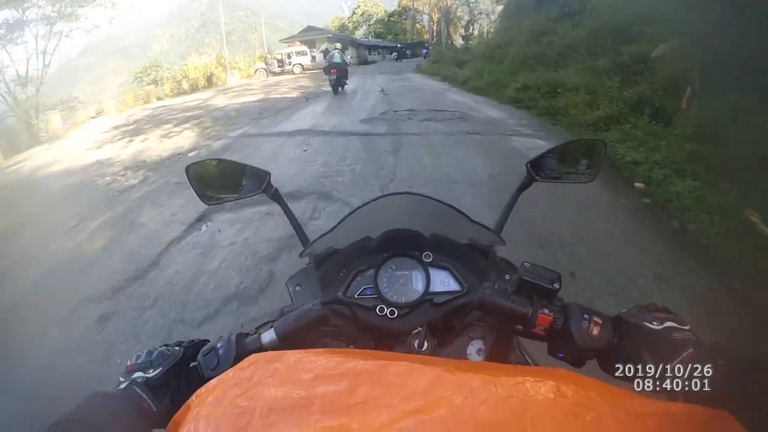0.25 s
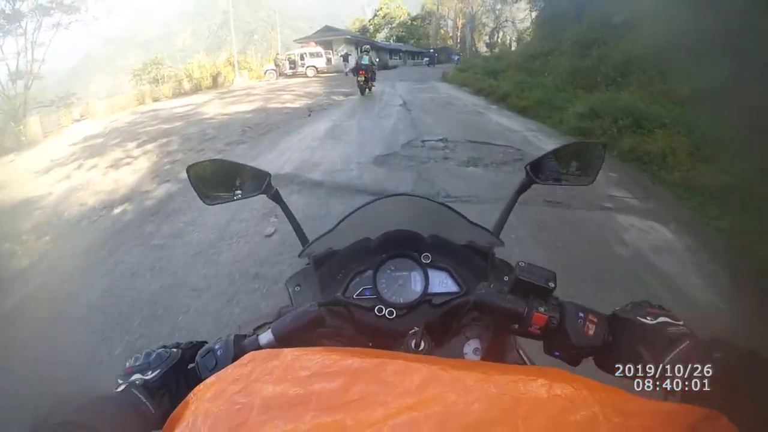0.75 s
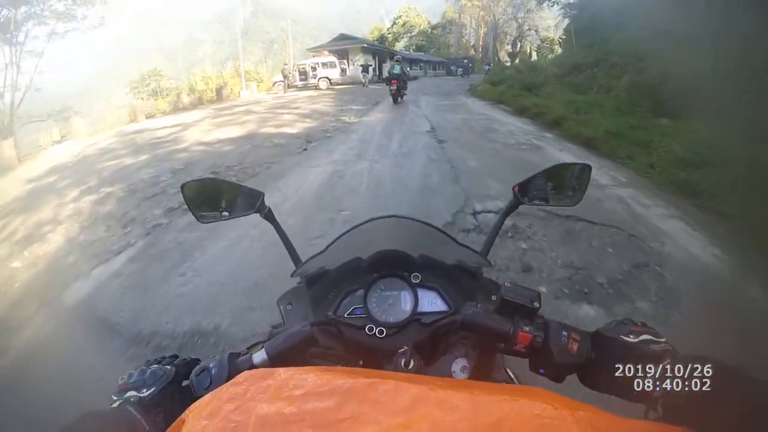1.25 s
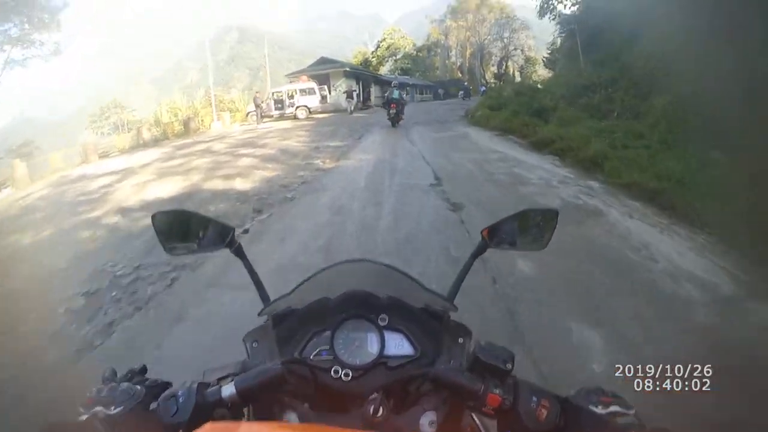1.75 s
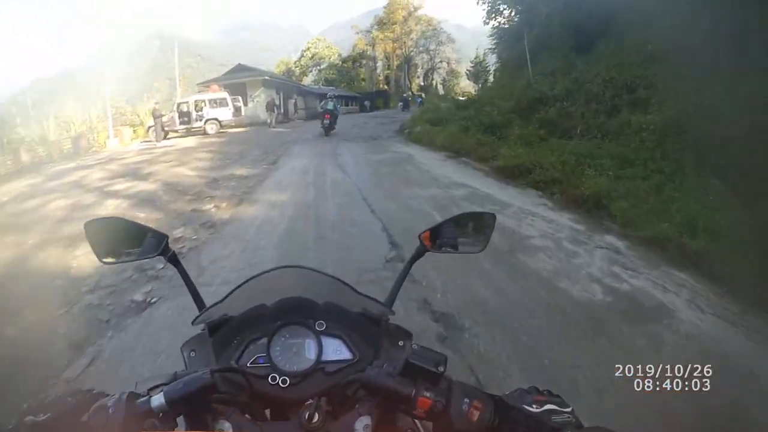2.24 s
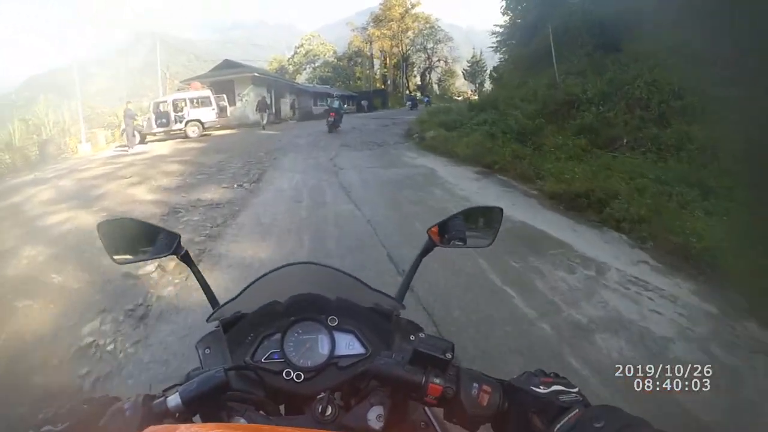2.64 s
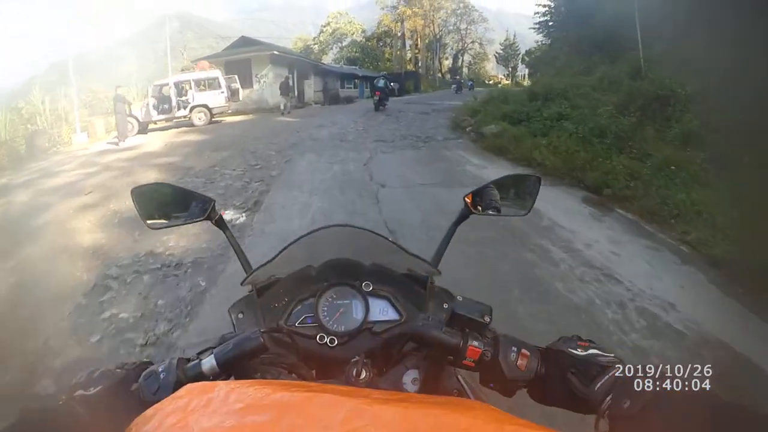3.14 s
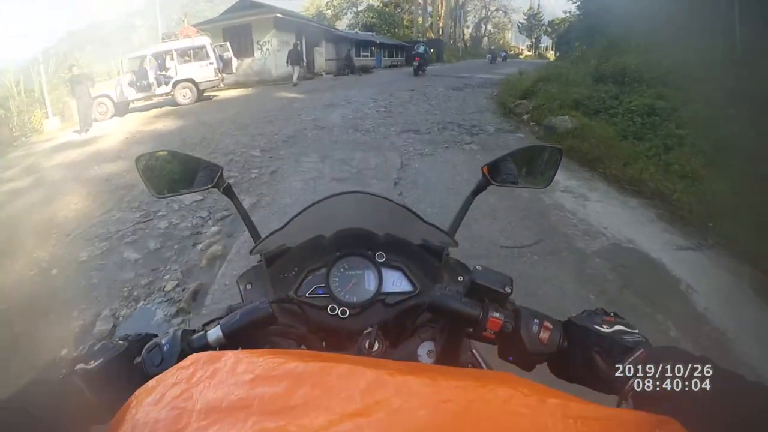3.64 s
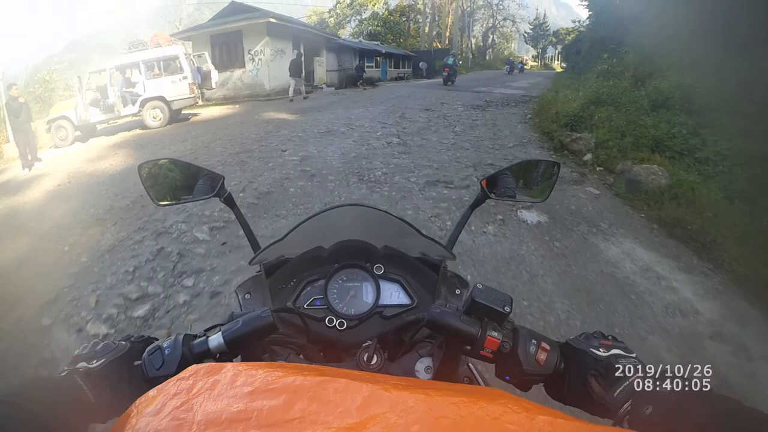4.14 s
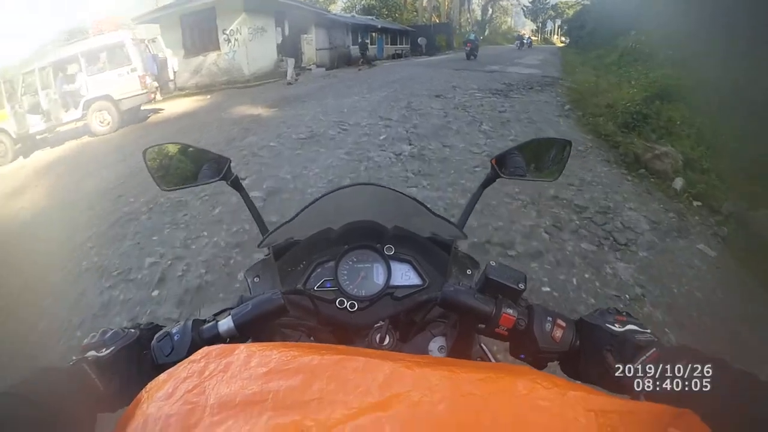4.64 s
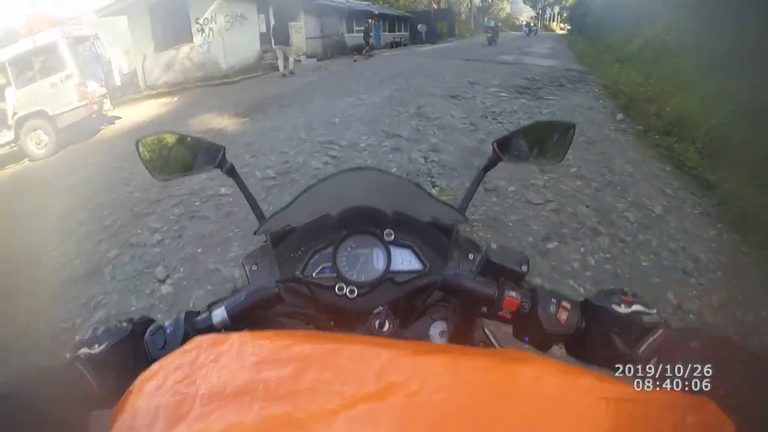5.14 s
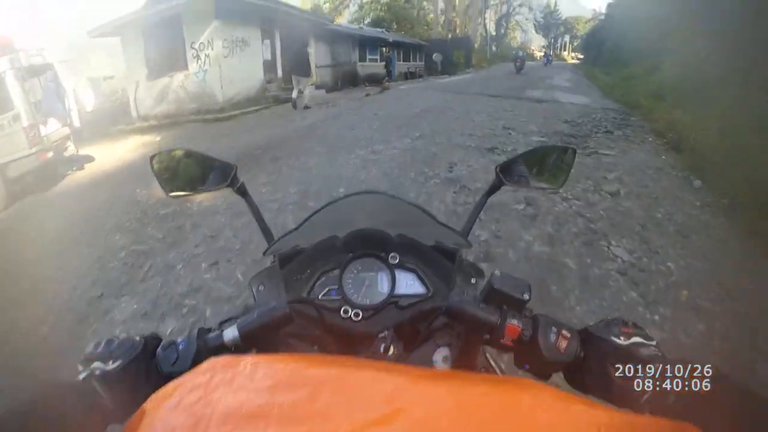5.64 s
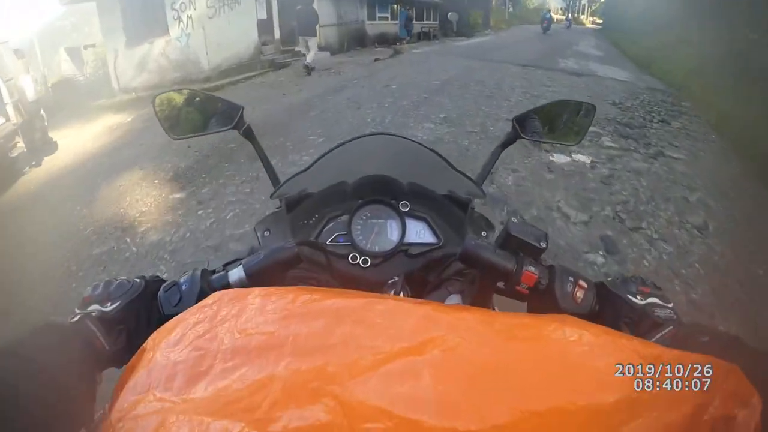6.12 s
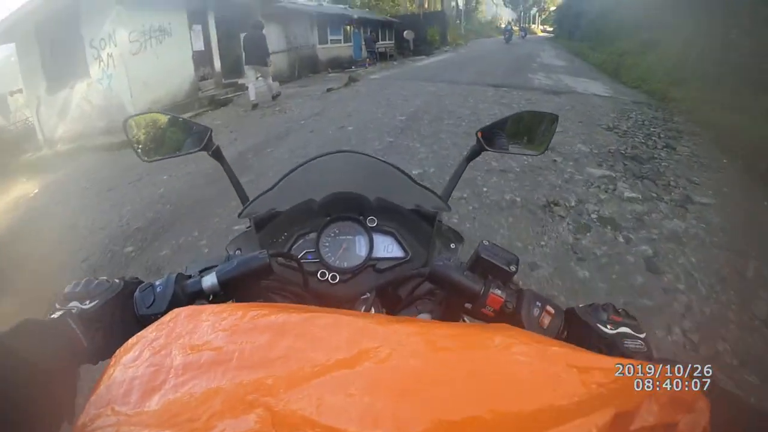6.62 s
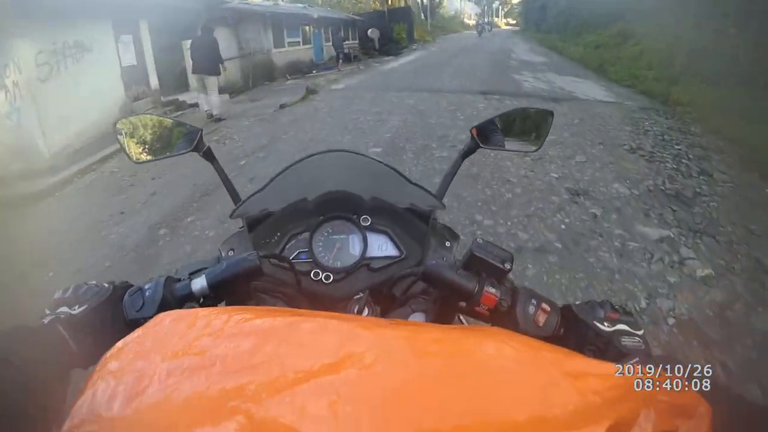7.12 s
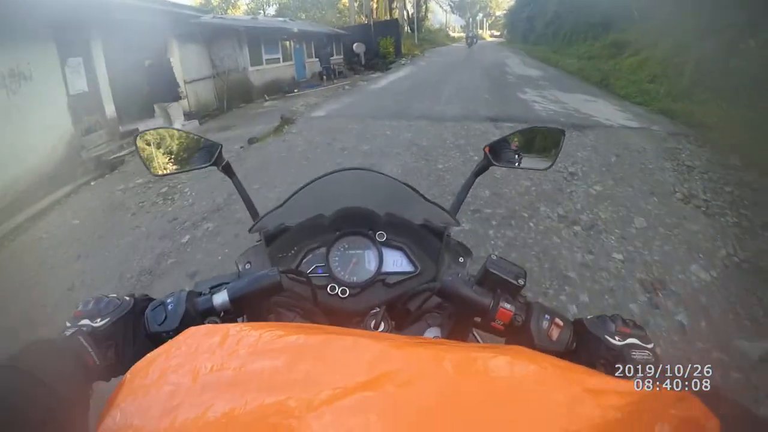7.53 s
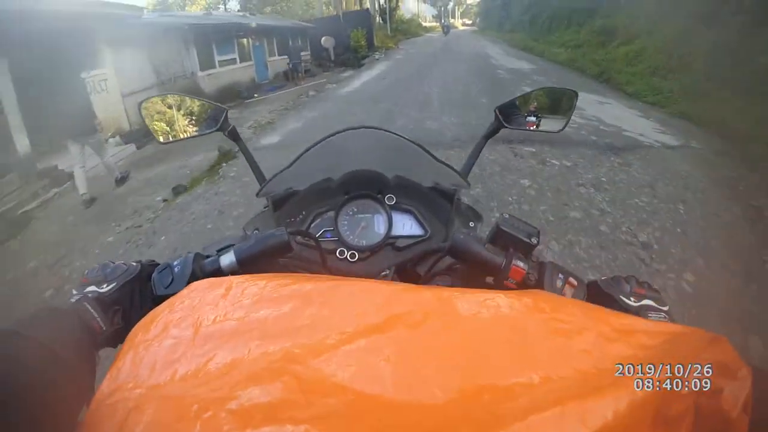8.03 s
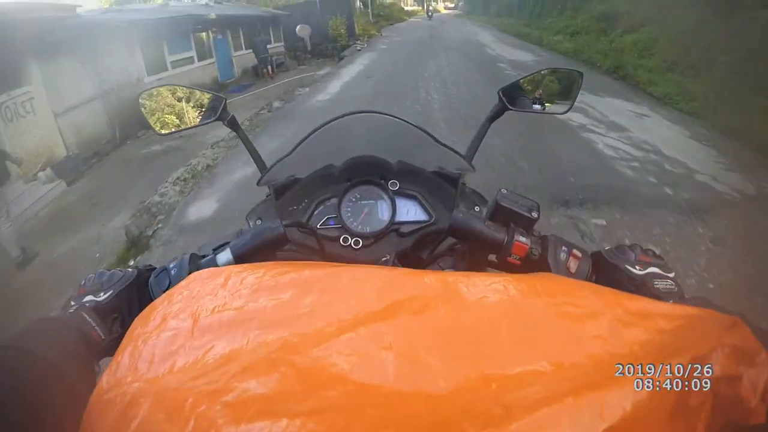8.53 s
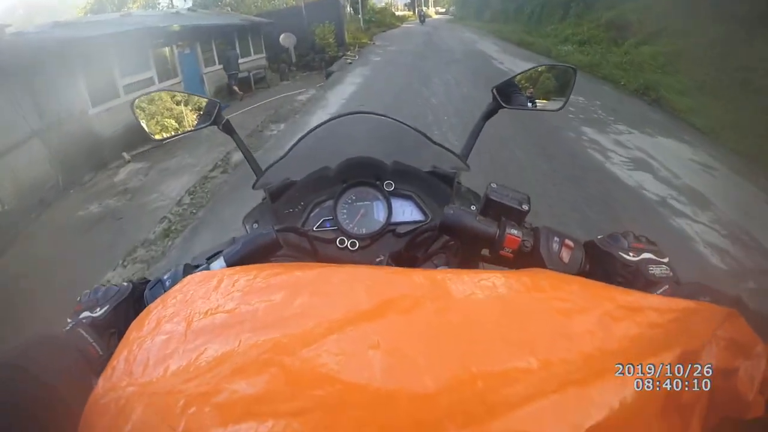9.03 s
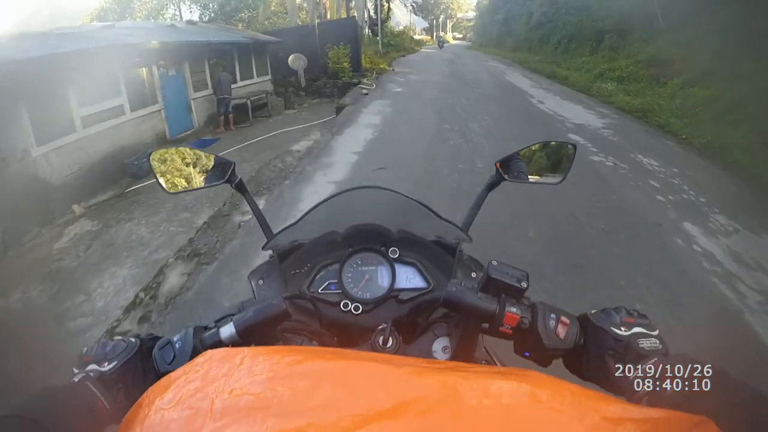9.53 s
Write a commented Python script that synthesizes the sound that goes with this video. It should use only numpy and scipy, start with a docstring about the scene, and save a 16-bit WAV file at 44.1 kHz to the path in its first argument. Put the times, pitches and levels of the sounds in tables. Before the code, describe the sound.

Muffled motorcycle ride on a rough mountain road: deep bumping thuds, boxy wind hiss, fabric rubs, another bike's low exhaust drone, faint insects.

```python
"""A sealed case on a motorcyclist's chest, on a rough mountain road: jolts and wind pump it, mostly below 40 Hz.
Wind and engine clatter hiss through the case's resonances; tyre roar and the own engine come through body and frame.
The mount knocks, fabric rubs, fairing panels hum and the frame booms: struck modes and filtered noise.
Behind: a second motorcycle built of firing harmonics, and cicadas, cricket and bush cricket of narrow noise."""
import sys
import numpy as np
from scipy import signal
from scipy.fft import rfft, irfft
from scipy.io import wavfile
from scipy.ndimage import uniform_filter1d

SR = 44100
rng = np.random.default_rng(int(sys.argv[2]) if len(sys.argv) > 2 else 0)


def int16_out(signal):
    """Quantize to a 16-bit WAV file."""
    q = np.round(np.clip(np.atleast_2d(signal).T, -1, 1) * 32767)
    wavfile.write(sys.argv[1], SR, q.astype(np.int16))


N = 430857
T = np.arange(N) / SR  # s

# Pumping of the case, in bumps, strongest near 1.4 and 6 s. Each row: time in seconds, rms level in dB.
PUMP_DB = [(0, -39), (.55, -23), (.75, -30.5), (1.25, -30.5), (1.42, -22), (1.9, -25), (2.25, -34),
           (3.05, -27), (3.45, -34.5), (3.75, -24), (4.22, -33.5), (4.45, -23.5), (5.4, -28), (6.0, -22),
           (6.9, -26), (7.6, -25), (8.2, -31), (8.95, -29), (9.77, -35)]
# Pumping spectrum. Each row: frequency in Hz, relative level in dB per Hz.
PUMP_SPECTRUM = [(1.5, 10), (4, 0.5), (8, 6.5), (16, 1.5), (30, -11.5), (50, -23.5), (90, -32.5),
                 (170, -48.5), (300, -52), (500, -67.5), (900, -77.5)]
# Big suspension jolts. Each row: middle in seconds, level before the bell envelope in dB, swing in Hz.
JOLTS = [(1.368, -12, 12), (1.698, -5.5, 21)]
# Tyre and wind roar. Each row: time in seconds, level in dB.
ROAR_DB = [(0, -56), (1, -65), (1.5, -50), (1.8, -48), (2.2, -49), (3, -54.5), (4, -60), (4.5, -54),
           (5, -61.5), (5.8, -55), (6.5, -58), (7.5, -55), (8.5, -54.5), (9.77, -50)]
# Roar spectrum. Each row: frequency in Hz, relative level in dB per Hz.
ROAR_SPECTRUM = [(30, -13), (50, 10.5), (78, -24), (100, 0), (170, -10.5), (250, -14.5), (400, -24),
                 (550, -53), (900, -58.5)]
# Modes of the case's air and walls. Each row: frequency in Hz, width in Hz, relative level in dB.
CASE_MODES = [(855, 128, -14), (1030, 245, -12.5), (1433, 106, -6), (1541, 263, -9), (1914, 400, -17.5),
              (2930, 630, -15.5), (3656, 515, -5), (4166, 540, 1.5), (5100, 150, -14.5), (5260, 440, -14),
              (5770, 2230, -19.5), (7550, 1940, -24), (8670, 370, -32), (9930, 410, -34.5),
              (11000, 1200, -38.5), (12160, 550, -37), (13900, 2300, -44)]
# Leak of the walls between the modes. Each row: frequency in Hz, relative level in dB.
WALL_LEAK = [(300, -18.5), (650, -21.5), (1250, -41), (2400, -21.5), (5000, -31), (8500, -34),
             (15000, -38.5)]
# Hiss balance. Each row: time in seconds, change in dB of the middle band, the lower modes, the treble.
HISS_BALANCE_DB = [(0, -1.5, 1, 2), (1.2, -2, 1, 1), (2.4, -1, 2.5, .5), (3.5, -1.5, 1, 0),
                   (4, 0, -1.5, -1.5), (4.7, -2, -2.5, -2.5), (6, -1.2, -1, -1.5), (7.2, -.5, -2, -1.5),
                   (8.1, 2, -1.5, 0), (8.8, .5, 1.5, .5), (9.77, 1.5, 0, .5)]
# Modes of the struck mount. Each row: frequency in Hz, relative level in dB, 60 dB decay in seconds.
MOUNT_MODES = [(208.5, -2.5, 0.12), (278, -9.5, 0.035), (319, -8.5, 0.094), (730, -25, 0.12),
               (1005, -2.5, 0.029), (1160, 0, 0.0076), (1440, 0.5, 0.028), (1926, 2.5, 0.012),
               (2370, -4.5, 0.021), (2860, 3.5, 0.013)]
# Blows on the mount. Each row: time in seconds, low body gain in dB, upper ring gain at 1 kHz in dB,
# dullness of the ring in dB per octave.
KNOCKS = [(1.631, -31.5, -39.5, 3), (1.645, -40, -41, 7), (1.67, -39, -48, 7), (1.86, -38, -44.5, 5),
          (5.754, -35.5, -40, -1), (5.764, -43, -40.5, 5), (6.251, -36, -38.5, -0.5), (6.263, -41, -47, 8),
          (7.9437, -37, -37, 2.5)]
# Own engine speed. Each row: time in seconds, firings per second.
ENGINE_FIRINGS_HZ = [(0, 24.93), (.81, 25.01), (1.22, 24.6), (1.63, 24.2), (3.26, 24.58), (3.66, 23.97),
                     (4.07, 22.5), (4.88, 18.7), (5.3, 18.4), (7.73, 20.9), (8.14, 21.86), (8.6, 22.2),
                     (8.96, 21.72), (9.77, 20.6)]
# Own engine load. Each row: time in seconds, gain in dB.
ENGINE_LOAD_DB = [(0, -72.5), (1, -69.5), (1.5, -79), (2.6, -72.5), (3.3, -72), (4, -74.5), (5, -80),
                  (7.6, -75), (8.2, -69.5), (9.2, -70.5), (9.77, -75.5)]
# Frame and body response. Each row: frequency in Hz, gain in dB.
ENGINE_SPECTRUM = [(20, -31), (48, 19), (80, -1), (170, -1.5), (230, -1), (290, 0), (420, -10.5),
                   (600, -42)]
# Gear whine under load. Each row: time in seconds, level in dB before its waver.
GEAR_DB = [(7.9, -100), (8.3, -73), (8.7, -62.5), (9.0, -68), (9.2, -92)]
# Speed of the other motorcycle. Each row: time in seconds, firings per second.
OTHER_FIRINGS_HZ = [(0, 19.9), (.41, 20.63), (.81, 21.5), (1.22, 22.25), (1.63, 22.73), (2.04, 23.12),
                    (2.85, 24.6), (3.66, 24.74), (4.07, 25.3), (4.48, 26.28), (4.88, 27.2), (5.29, 27.74),
                    (6.11, 28.67), (6.92, 29.71), (7.33, 30.27), (8.96, 30.54), (9.77, 31.2)]
# Load of the other motorcycle. Each row: time in seconds, gain in dB.
OTHER_LOAD_DB = [(0, -56.5), (1.3, -55.5), (2, -60.5), (3, -56), (3.8, -59), (4.2, -55.5), (5.3, -57.5),
                 (6.5, -57.5), (7.5, -58.5), (9.77, -61)]
# Exhaust response of the other motorcycle. Each row: frequency in Hz, gain in dB.
EXHAUST_SPECTRUM = [(60, -46), (100, -4.5), (130, -1), (170, -3), (200, -10), (280, -27.5)]
# Cicadas passing by. Each row: time in seconds, chorus level in dB.
CICADA_DB = [(0, -76), (2.5, -71), (4, -89), (5.2, -72.5), (6.3, -65), (7.4, -64), (7.7, -78), (8.2, -73),
             (8.6, -62.5), (9.3, -62.5), (9.77, -60)]
# Cicada drums. Each row: frequency in Hz, pole width in Hz, relative level in dB.
CICADA_DRUMS = [(5470, 130, -2), (5790, 130, 0), (5960, 150, 0), (6150, 170, -3), (6430, 130, -4)]
# Cricket note. Each row: time in seconds, pitch in Hz, level in dB.
CRICKET = [(8.1, 3470, -84), (8.17, 3470, -60), (8.55, 3470, -62), (8.7, 3410, -65), (8.85, 3430, -61),
           (8.96, 3470, -59), (9.02, 3470, -90)]
# Bush cricket, one row: a beat in seconds, last beat in seconds, rasps per second, frequency in Hz,
# pole width in Hz, level at the beat in dB before its waver.
RASPS = (3.0, 8.5, 5.5, 11094, 300, -82.5)
# Start and end of the rasps' fade-in in seconds.
RASP_FADE_S = (1.5, 3.0)
# Spectrum of the dull rub. Each row: frequency in Hz, relative level in dB per Hz.
RUB_SPECTRUM = [(150, 6), (300, 0), (650, 2), (1000, 1), (1500, -4.5), (2000, -3.5), (3000, -5.5),
                (4500, -27)]
# Clothing and strap rubs as the rider is shaken. Each row: middle in seconds, length in seconds,
# level of the dull part in dB, added to the steady rubbing.
RUBS = [(.5, .1, -73), (1.15, 0.13, -73), (1.365, .08, -56), (1.68, 0.081, -55.5), (1.87, 0.069, -65),
        (2.12, 0.27, -61), (2.24, 0.11, -59), (2.34, .07, -55), (2.455, 0.056, -60.5), (2.74, 0.062, -59),
        (2.82, 0.066, -55.5), (2.99, 0.049, -61), (3.44, .08, -63.5), (3.61, 0.11, -64.5),
        (4.44, 0.059, -63.5), (4.525, 0.055, -60), (4.65, 0.034, -62.5), (5.18, 0.054, -57.5),
        (5.64, 0.09, -58), (5.83, 0.073, -63), (6.15, 0.088, -68), (6.51, .1, -70), (6.65, .1, -65),
        (6.84, .12, -68), (7.15, 0.12, -68), (7.37, 0.071, -60.5), (8.03, 0.07, -61), (9.0, 0.053, -66),
        (9.26, 0.18, -65.5)]
# Light rubbing that never stops. Each row: time in seconds, dull level in dB before its wander.
RUB_BED_DB = [(0, -70), (2, -71), (3.1, -85), (5, -74.5), (6.3, -68.5), (7.9, -65), (9.77, -72.5)]
# Humming fairing panels. Each row: frequency in Hz, pole width in Hz.
PANEL_MODES = [(814, 38), (1040, 24), (3700, 290)]
# Panel hum. Each row: time in seconds, level of each of the three panels in dB.
PANEL_DB = [(0, -68, -73, -67), (1.3, -73.5, -74, -54.5), (2.5, -69.5, -65, -67), (3.3, -75, -67, -69.5),
            (3.6, -85, -79, -60), (4.5, -73, -78, -70), (5.5, -77, -73, -68), (6.3, -69, -78, -69),
            (7.8, -68.5, -70, -80), (8.5, -71, -71, -78), (9.77, -66, -83, -82)]
# Low mode of the frame, one row: frequency in Hz, pole width in Hz.
FRAME_MODE = (79.8, 14.6)
# Stones and ruts booming the frame. Each row: middle in seconds, length in seconds,
# level of the boom in dB, added to the steady bed.
BOOMS = [(1.17, 0.13, -50.5), (1.4, 0.078, -49), (1.66, .15, -42.5), (1.88, 0.24, -48), (2.3, .2, -51),
         (2.78, 0.26, -53.5), (4.53, 0.22, -49), (5.25, 0.092, -49), (5.78, 0.076, -44),
         (7.35, 0.29, -60.5)]

BOOM_BED_DB = -60
RUB_WANDER_DB, RUB_WANDER_S = 3.0, 0.053
GEAR_TEETH = 72
BODY_TOP_HZ = 500
DRUM_WAVER_DB = 1.6
EDGE_HZ = 15350


def gain_of(db):
    """Decibels to an amplitude factor."""
    return 10 ** (np.asarray(db) / 20)


def evened(x):
    """Scales to rms 1."""
    return x / np.sqrt(np.mean(np.abs(x) ** 2) + 1e-20)


def white():
    """White noise of N samples."""
    return rng.standard_normal(N)


def read(points, hz):
    """Reads a spectrum table at the given frequencies, linear in dB over log frequency."""
    f, value = np.transpose(points)
    return np.interp(np.log(hz + 0.081), np.log(f), value)


def curves(rows):
    """Each column of a time table at every sample."""
    s, *columns = np.transpose(rows)
    return [np.interp(T, s, c) for c in columns]


def swells(rows):
    """Sum of bell-shaped gains, one per row of middle, length and level."""
    slow = T[::32]
    bells = sum(gain_of(db) * np.exp(-(2 * (slow - s) / length) ** 2) for s, length, db in rows)
    return np.interp(T, slow, bells)


def coloured(x, gain):
    """Filters by a gain given as a function of frequency."""
    return irfft(rfft(x) * gain(np.fft.rfftfreq(N, 1 / SR)), N)


def drift(seconds):
    """Noise smoothed twice over the given span, rms 1."""
    size = max(int(seconds * SR), 2)
    return evened(uniform_filter1d(uniform_filter1d(white(), size), size))


def resonate(x, hz, width_hz):
    """Steep resonance: shifts hz down to zero, smooths by a double pole, shifts back."""
    turn = np.exp(2j * np.pi * np.cumsum(hz * np.ones(N)) / SR)
    r = np.exp(-np.pi * width_hz / SR)
    smooth = signal.lfilter([(1 - r) ** 2], [1, -2 * r, r * r], x / turn)
    return 2 * (turn * smooth).real


def case_gain(hz):
    """Summed power of the case's modes and its wall leak, as amplitude; nothing up to 250 Hz."""
    modes = sum(gain_of(2 * db) / (1 + (2 * (hz - f) / w) ** 2) ** 2.66 for f, w, db in CASE_MODES)
    return np.sqrt(modes + gain_of(2 * read(WALL_LEAK, hz))) * (hz > 250)


def motor(speed, load, spectrum, wobble, waver_db, count):
    """Firing harmonics 2 to count - 1 of a single cylinder, each wavering; also returns the turns."""
    rate_hz = curves(speed)[0]
    turns = np.cumsum(rate_hz * (1 + wobble * drift(0.08))) / SR
    slow = slice(None, None, 40)
    waver = uniform_filter1d(rng.standard_normal((count, len(T[slow]))), 220, axis=1)
    waver = gain_of(waver_db * evened(waver))
    tone = np.zeros(N)
    for k in range(2, count):
        strength = waver[k - 1] * gain_of(read(spectrum, k * rate_hz[slow]))
        tone += np.interp(T, T[slow], strength) * np.cos(2 * np.pi * k * turns - .25 * k * k)
    return gain_of(curves(load)[0]) * tone, turns


def cicadas():
    """Drums as fuzzy resonant bands, each wavering."""
    drums = sum(gain_of(db + DRUM_WAVER_DB * drift(0.11)) * resonate(white(), hz, w)
                for hz, w, db in CICADA_DRUMS)
    return evened(drums) * gain_of(curves(CICADA_DB)[0])


def cricket():
    """One thin note: noise through a very narrow, gliding resonance."""
    hz, db = curves(CRICKET)
    return evened(resonate(white(), hz, 12)) * gain_of(db)


def bush_cricket():
    """Narrow noise rasping in steady time."""
    beat_s, last_s, rate_hz, hz, width_hz, db = RASPS
    beat = .5 + .5 * np.cos(2 * np.pi * rate_hz * (T - beat_s))
    beat = beat * np.interp(T, RASP_FADE_S, (0, 1)) * (T < last_s + .5 / rate_hz)
    return gain_of(db + 2.8 * drift(.25)) * beat ** 2 * evened(resonate(white(), hz, width_hz))


def other_motorcycle():
    """Steadier exhaust harmonics of the second motorcycle, climbing in speed."""
    return motor(OTHER_FIRINGS_HZ, OTHER_LOAD_DB, EXHAUST_SPECTRUM, .002, 1.8, count=11)[0]


def grit():
    """Faint treble crackle: bright bursts of uneven size, decaying with a 1 ms time constant."""
    sizes = gain_of(2.6 * np.minimum(rng.exponential(1, N), 2.8))
    hits = sizes * (rng.random(N) < 70 / SR)  # 70 per s on average
    bursts = signal.lfilter([1], [1, -np.exp(-1 / (0.001 * SR))], hits) * white()
    bright = coloured(bursts, lambda hz: case_gain(hz) / (1 + (6500 / (hz + 1)) ** 8))
    return gain_of(-77.5) * evened(bright)


def panels():
    """Fairing panels' narrow modes, kept ringing by the shaking."""
    return sum(gain_of(db) * evened(resonate(white(), hz, width_hz))
               for (hz, width_hz), db in zip(PANEL_MODES, curves(PANEL_DB)))


def frame_boom():
    """The frame's low mode, swelling over stones and ruts."""
    return (gain_of(BOOM_BED_DB) + swells(BOOMS)) * evened(resonate(white(), *FRAME_MODE))


def own_engine():
    """Firing harmonics through frame and body, and gear whine at the tooth rate."""
    firing, turns = motor(ENGINE_FIRINGS_HZ, ENGINE_LOAD_DB, ENGINE_SPECTRUM, 0.003035, 3.67, count=24)
    whine = gain_of(curves(GEAR_DB)[0] + 2.5 * drift(.03)) * np.sin(2 * np.pi * GEAR_TEETH * turns)
    return firing + whine


def scrape():
    """Dense slips of fabric on plastic: a dull rub, and a part ringing the case's lower modes."""
    slips = gain_of(1.53 * rng.exponential(1, N)) * (rng.random(N) < 1500 / SR)  # 1500 per s on average
    slips = slips * rng.choice([-1, 1], N) * gain_of(2.0 * drift(0.035))
    # the phase term makes the lows lag
    dull = coloured(slips, lambda hz: gain_of(read(RUB_SPECTRUM, hz)) * np.exp(-1j * np.sqrt(hz) * 0.7956))
    ringing = sum(gain_of(db) * resonate(slips, hz, 1.12 * w) for hz, w, db in CASE_MODES if hz < 3200)
    bed = gain_of(curves(RUB_BED_DB)[0] + RUB_WANDER_DB * drift(RUB_WANDER_S))
    return (evened(dull) + gain_of(-12.0) * evened(ringing)) * (swells(RUBS) + bed)


def ring(body_db, upper_db, dull_db, shifts):
    """One blow: each mode starts within 4 ms, rises in part of a cycle and decays."""
    t = np.arange(4000) / SR
    out = np.zeros(len(t))
    for (hz, db, t60_s), shift in zip(MOUNT_MODES, shifts):
        u = np.maximum(t - 0.00398 * shift, 0)
        blow_db = body_db if hz < BODY_TOP_HZ else upper_db - dull_db * np.log2(hz / 1000)
        rise = 1 - np.exp(-u * hz / 0.42)
        out += gain_of(db + blow_db - 60 * u / t60_s) * rise * np.sin(2 * np.pi * hz * u)
    return out


def mount():
    """Knocks ringing the mount's modes."""
    out = np.zeros(N)
    for (s, *blow), shifts in zip(KNOCKS, rng.random((len(KNOCKS), len(MOUNT_MODES)))):
        part = out[round(s * SR):][:4000]
        part += ring(*blow, shifts)[:len(part)]
    return out


def roar():
    """Tyre and wind roar through the rider's body: low noise in lumps."""
    noise = coloured(white(), lambda hz: gain_of(read(ROAR_SPECTRUM, hz)))
    return evened(noise * gain_of(3.5 * drift(0.016))) * gain_of(curves(ROAR_DB)[0])


def hiss():
    """Wind and engine clatter through the case, in drifting patches with a shared flicker."""
    hz, t, z = signal.stft(coloured(white(), case_gain), SR, nperseg=512)
    hz = hz[:, None]
    patches = uniform_filter1d(rng.standard_normal(z.shape), 4, 0)
    patches = evened(uniform_filter1d(patches, 30, 1))
    flicker = np.interp(t, T, drift(0.098) + 1.9 * drift(0.0042))
    flicker = flicker * np.clip((hz / 9000) ** 0.28, .15, 1.8)  # stronger in the treble
    middle_db, low_db, treble_db = (np.interp(t, T, c) for c in curves(HISS_BALANCE_DB))
    low = 1 / (1 + (hz / 2500) ** 6)
    treble = 1 / (1 + (6000 / (hz + 1)) ** 8)
    balance_db = low * low_db + treble * treble_db + (1 - low - treble) * middle_db
    z = z * gain_of(1.02 * patches + 0.48 * flicker + balance_db)
    return gain_of(-50.5) * evened(signal.istft(z, SR, nperseg=512)[1][:N])


def pumping():
    """Road shocks and gusts squeeze the sealed air: lumpy near-infrasound and two single swings."""
    sway = coloured(white(), lambda hz: gain_of(read(PUMP_SPECTRUM, hz)))
    out = evened(sway) * gain_of(curves(PUMP_DB)[0])
    for s, db, hz in JOLTS:
        u = (T - s) * hz * 2 * np.pi
        out += gain_of(db) * np.sin(u) * np.exp(-(u / 2.6) ** 2)
    return out


def scene():
    """Sum of all sources, one channel."""
    insects = cicadas() + cricket() + bush_cricket()
    machines = other_motorcycle() + own_engine() + panels() + frame_boom()
    case = grit() + scrape() + mount() + roar() + hiss() + pumping()
    return (insects + machines + case)[None]


def record(dry):
    """Low-pass at the recorder's band edge."""
    lowpass = signal.firwin(1023, EDGE_HZ, window=("kaiser", 10), fs=SR)
    return signal.oaconvolve(dry, lowpass[None], "same")


dry = scene()
out = record(dry)
int16_out(out)
```